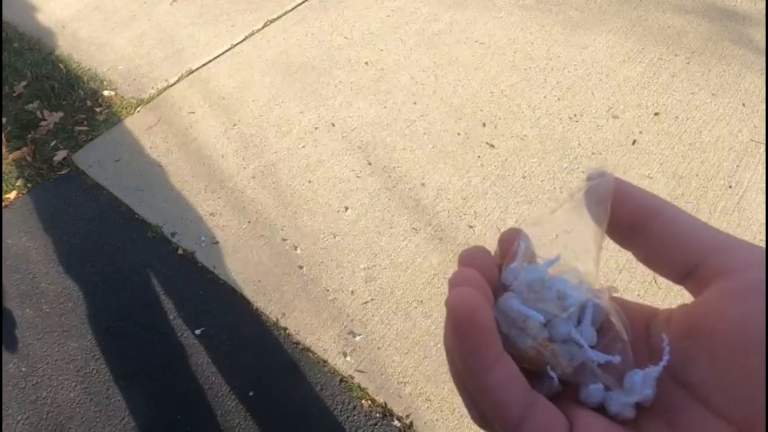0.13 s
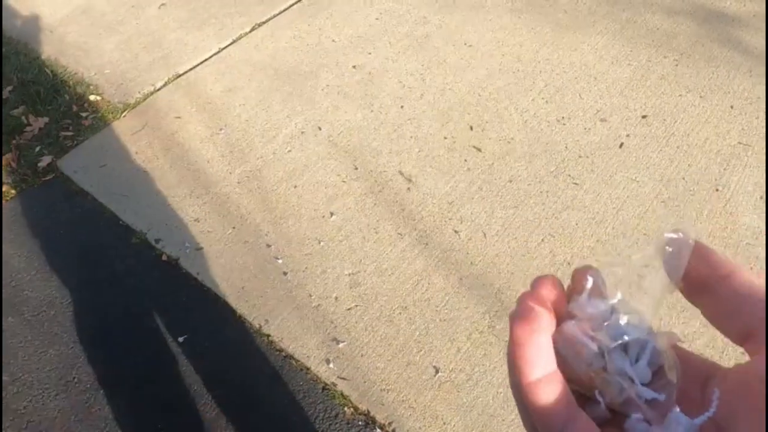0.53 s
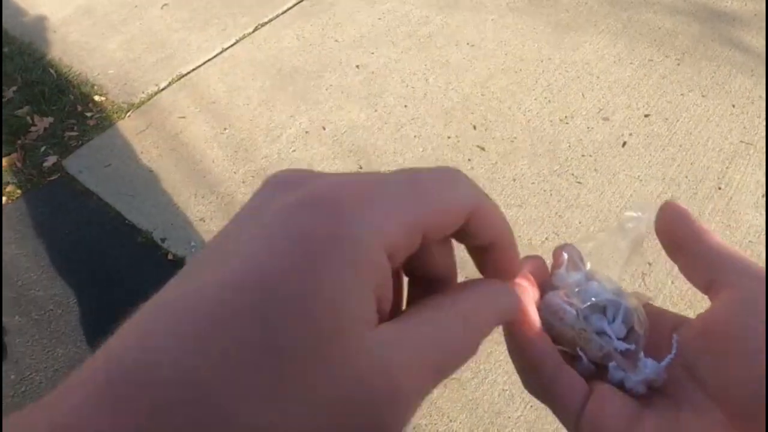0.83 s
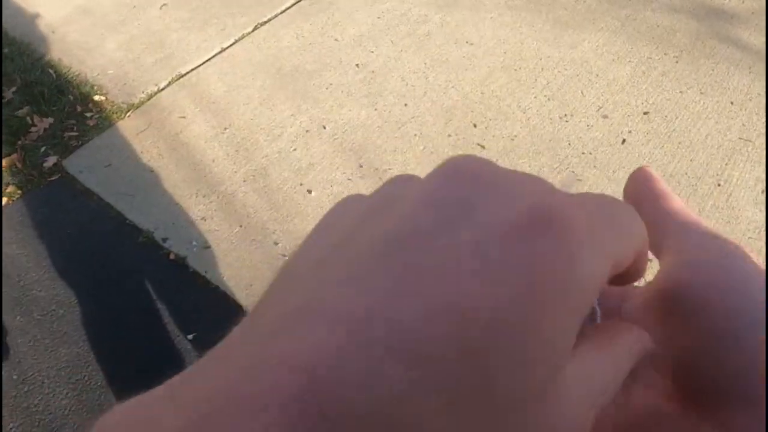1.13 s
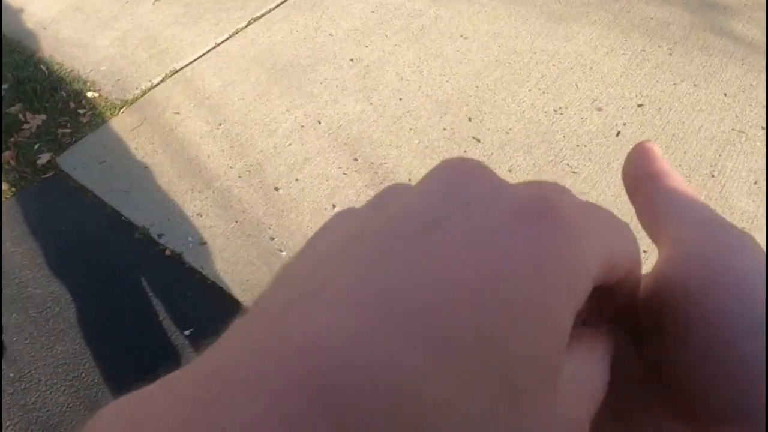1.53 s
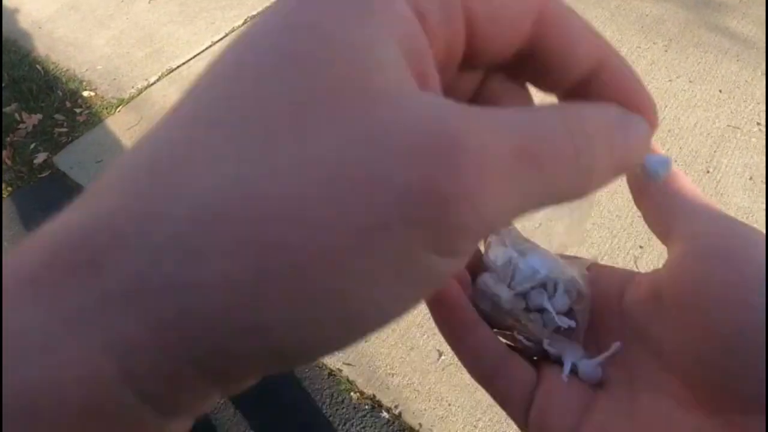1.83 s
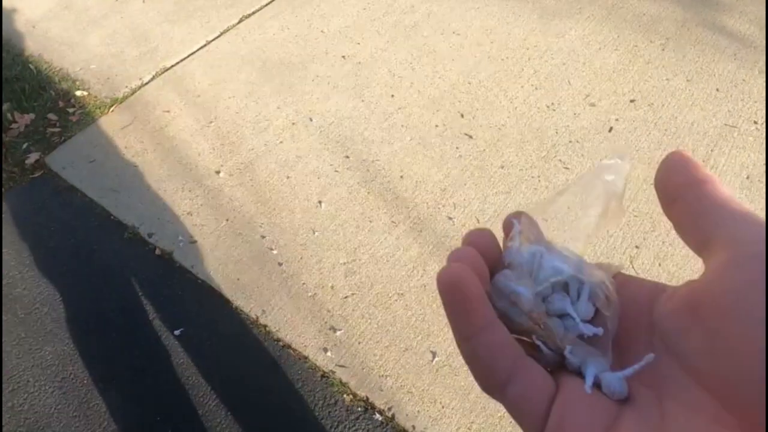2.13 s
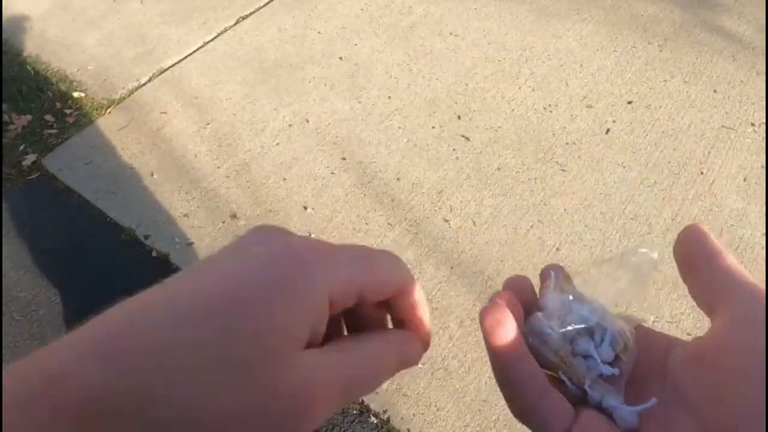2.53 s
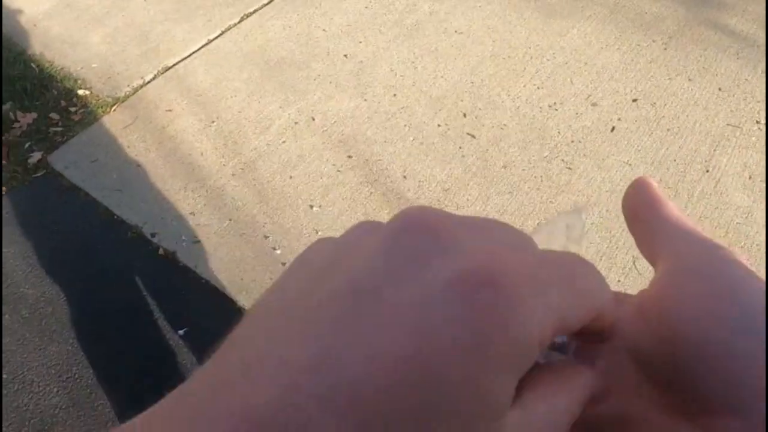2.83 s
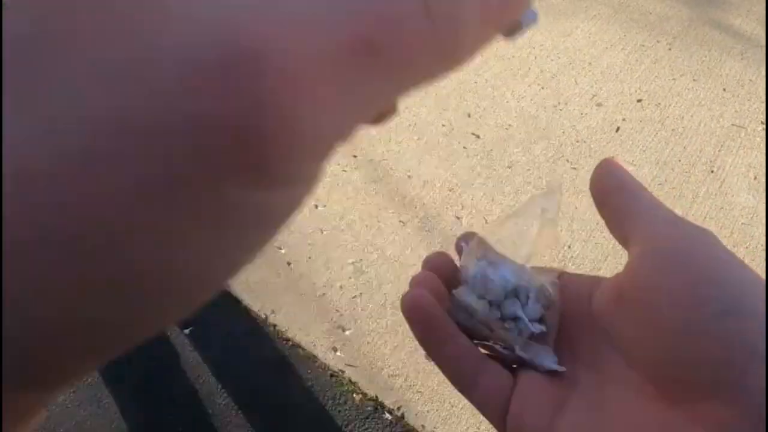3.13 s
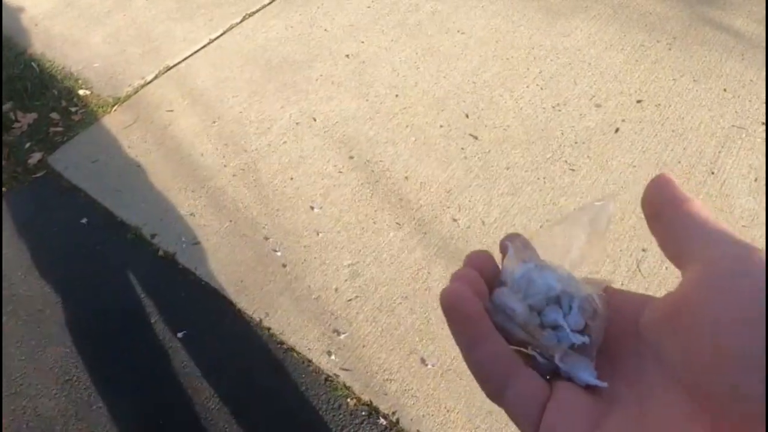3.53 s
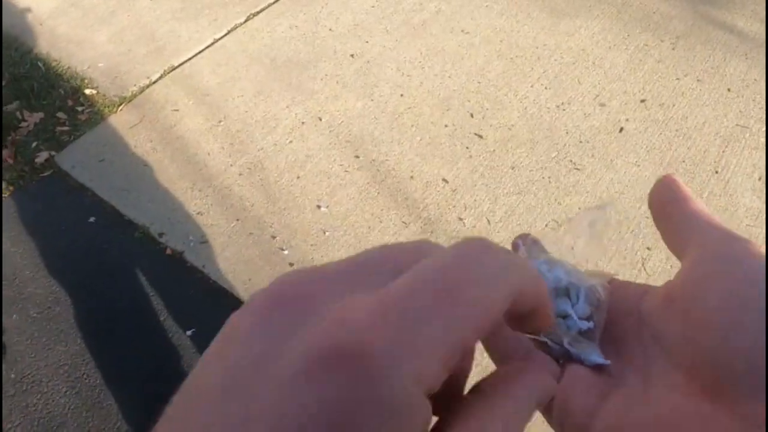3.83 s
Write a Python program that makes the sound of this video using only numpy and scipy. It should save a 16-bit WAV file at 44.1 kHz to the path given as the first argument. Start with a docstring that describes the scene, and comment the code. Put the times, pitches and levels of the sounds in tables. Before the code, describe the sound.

Small paper snaps pop loudly one by one on a pavement, amid low handling rumble and wind.

```python
"""Paper snaps on a pavement, body-worn microphones

Outdoors, three paper snaps are thrown; each bursts into noise, echoes off nearby walls and leaves a tail.
Every throw rocks the small camera: a wandering sub-bass swing, thuds as short pushes between two dips,
and flickering noise for air on its ports, with brief brighter swishes. Between throws fingers pick in
a thin plastic bag, as noise bursts and fine grains. Late on, the recorder fades the stereo to mono."""
import sys
import numpy as np
from scipy import signal
from scipy.io import wavfile

SR = 44100
rng = np.random.default_rng(int(sys.argv[2]) if len(sys.argv) > 2 else 0)


def persist_wave(psi):
    """Save psi, clipped to +-1, as 16-bit WAV."""
    counts = np.round(np.clip(psi, -1, 1) * 32767).astype(np.int16)
    wavfile.write(sys.argv[1], SR, np.atleast_2d(counts).T)


N = 176400
OPPOSITE = np.array([[1], [-1]])  # how a side signal enters left and right

# paper snaps: start_s, level_db, extra_brightness_db, extra_bite_db (near 4 and 7 kHz), far_wall_echo_db
SNAPS = [(.6378, -2.5, 0, 1, -30), (2.4404, -3.5, 7, 1, -37), (3.6897, -5, -4, -9, -46)]


def amp(db):
    """Decibels to an amplitude factor."""
    return 10 ** (np.asarray(db) / 20)


def rms_one(x):
    """Scale to an rms of 1."""
    return x / np.sqrt(np.mean(x ** 2) + 1e-20)


def in_time(rows):
    """Draw each column as straight lines between the times in the first."""
    times_s, *columns = np.transpose(rows)
    return [np.interp(np.arange(N) / SR, times_s, column) for column in columns]


def at_hz(points, hz):
    """Read a curve at a frequency, on a logarithmic frequency scale."""
    points = np.array(points)
    return np.interp(np.log(hz), np.log(points[:, 0]), points[:, 1])


def band(x, low_hz, high_hz, order=2):
    """Keep the sound between two frequencies."""
    edges_hz = [low_hz, min(high_hz, .45 * SR)]
    return signal.sosfilt(signal.butter(order, edges_hz, "band", fs=SR, output="sos"), x)


def drift(rate_hz):
    """Slow random wander of rms 1: noise through two equal one-pole smoothers."""
    step = 40  # samples between drawn points
    r = np.exp(-2 * np.pi * rate_hz * step / SR)
    noise = rng.standard_normal(N // step + 2002)
    slow = signal.lfilter([1], [1, -2 * r, r * r], noise)[2000:]  # drop the settling
    return np.interp(np.arange(N) / step, np.arange(len(slow)), rms_one(slow))


def resonate(x, hz, width_hz):
    """Ring one damped resonance; a wider one dies sooner."""
    r = np.exp(-np.pi * width_hz / SR)
    feedback = [1, -2 * r * np.cos(2 * np.pi * hz / SR), r * r]
    return signal.lfilter([(1 - r * r) / 2, 0, (r * r - 1) / 2], feedback, x)


def add(out, start_s, piece):
    """Mix a stereo piece in at a time."""
    i = int(start_s * SR)
    out[:, i:i + piece.shape[1]] += piece[:, :max(N - i, 0)]


def banded_noise(spectrum, patchy_db, rate_hz, shape=lambda hz: 1):
    """Third-octave stereo noise, each band with its level, flicker and likeness; mid rms 1 before the shape."""
    # how alike the two ports hear: hz, left_right_likeness (0 to 1)
    likeness = [(60, 1), (180, 0.78), (500, 0.19), (5000, 0.29)]
    edges = spectrum[0][0] * 2 ** np.arange(0, 12, 1 / 3)
    edges = edges[edges < min(spectrum[-1][0], .44 * SR)]
    together = drift(rate_hz)  # flicker shared by all bands
    white = rng.standard_normal((2, 2, N))
    out, power = 0, 0
    for k, (low, high) in enumerate(zip(edges, edges[1:])):
        mid, side = band(white[k % 2], low, high, order=3)
        hz = np.sqrt(low * high)
        alike = np.clip(at_hz(likeness, hz), 0, .99)
        flicker_db = patchy_db * (together + .5 * drift(rate_hz))
        gain = amp(at_hz(spectrum, hz) + flicker_db)
        piece = gain * (np.sqrt(1 + alike) * mid + np.sqrt(1 - alike) * side * OPPOSITE)
        out = out + piece * shape(hz)
        power = power + np.mean(piece.mean(0) ** 2)
    return out / np.sqrt(power)


def lurch():
    """The camera's slow swing of wandering pitch with lumpy flutter, nearly the same on both ports."""
    # sub-bass swing of the camera: time_s, level_db
    lurch_levels = [(0.0, -41), (0.34, -26), (0.43, -12), (0.53, -9.5), (1.09, -37), (1.15, -28.5),
                    (1.48, -46.5), (1.59, -22), (1.7, -42.5), (1.78, -29), (2.14, -38.5), (2.19, -18),
                    (2.41, -4.5), (2.44, -15.5), (2.71, -27), (3.26, -40.5), (3.62, -6.5), (3.77, -14),
                    (3.83, -20), (4.0, -23.5)]
    centre_hz, pitch_wander, flutter_db, side_db = 14, 0.46, -10.5, -24
    level_db, = in_time(lurch_levels)
    pitch_hz = centre_hz * np.exp(pitch_wander * np.tanh(drift(9.01)))
    phase = 2 * np.pi * np.cumsum(pitch_hz) / SR
    swing = np.sqrt(2) * np.sin(phase) * amp(1.5 * drift(10))
    flutter, side = rms_one(band(rng.standard_normal((2, N)), 18, 45, order=4))
    return amp(level_db) * (swing + amp(flutter_db) * flutter + amp(side_db) * side * OPPOSITE)


def air():
    """Air buffeting the ports: flickering low boom and higher rush, each following its own level."""
    # air on the ports: time_s, boom_level_db, rush_level_db (both before the lifts below)
    air_levels = [(0.0, -64.5, -65), (0.2, -57.5, -59), (0.56, -35, -35.5), (0.81, -59, -58.5),
                  (1.32, -65.5, -64), (1.82, -72, -67), (2.08, -55, -54.5), (2.36, -33.5, -34),
                  (2.42, -37, -38.5), (2.65, -59, -55.5), (2.86, -67.5, -75), (3.15, -68.5, -71),
                  (3.41, -55.5, -57.5), (3.61, -31.5, -34.5), (3.69, -32.5, -33.5), (3.84, -52.5, -57.5),
                  (4.0, -57, -59.5)]
    # colour of the boom: hz, density_db (per Hz)
    boom_spectrum = [(29, -39), (50, -2.5), (64, -10.5), (275, -16), (548, -24.5), (900, -33), (1170, -49),
                     (1980, -120)]
    # colour of the rush: hz, density_db (per Hz)
    rush_spectrum = [(500, -12.5), (980, -6.5), (1240, 8.5), (1640, -9.5), (2200, -20.5), (3600, -20.5),
                     (5500, -35.5), (7500, -53)]
    boom_lift_db, rush_lift_db = 10, 3.0
    gust_hz, gust_slope = 132.16, 0.1  # below gust_hz: extra dB per dB of boom level
    boom_db, rush_db = in_time(air_levels)

    def gust(hz):
        """The lowest bands sink further whenever the boom is below its strongest."""
        return amp((hz < gust_hz) * gust_slope * (boom_db - boom_db.max()))
    boom = banded_noise(boom_spectrum, 2.8, 17, gust)
    rush = banded_noise(rush_spectrum, 2.58, 24)
    return amp(boom_db + boom_lift_db) * boom + amp(rush_db + rush_lift_db) * rush


def floor():
    """Steady quiet noise under everything, flickering only slightly."""
    # colour of the floor: hz, density_db (per Hz)
    floor_spectrum = [(900, -9), (1300, 9), (1800, -7), (3400, -9), (5200, -20), (7300, -23), (8600, -40),
                      (11000, -48)]
    level_db = -65
    return amp(level_db) * banded_noise(floor_spectrum, 0.36, 5)


def thuds():
    """Each jolt of the mount is one short push between two dips, with a dull noisy knock on top."""
    # jolts of the mount: centre_s, level_db, pitch_hz, knock_db (relative to the push)
    jolts = [(0.4, -23, 149.8, -15), (0.507, -28.5, 260.5, -0.5), (0.547, -10.5, 138.4, -7.5),
             (0.809, -28, 218, -17), (1.74, -42.5, 105.5, -20), (2.085, -35.5, 204, -11.5),
             (2.393, -6.5, 122.3, -12), (2.514, -15.5, 145, -16), (2.641, -29.5, 194, -15.5),
             (3.565, -1.5, 174.1, -6.5), (3.59, -7.5, 142, -19.5), (3.63, -12.5, 189.7, -5),
             (3.865, -26.5, 206, -12)]
    width_turns, knock_low_hz, knock_high_hz = 0.48, 200, 1100  # width and top before the level acts on them
    out = np.zeros((2, N))
    for centre_s, level_db, hz, knock_db in jolts:
        half = int(2 * SR / hz)
        turns = np.arange(-half, half) * hz / SR
        # softer jolts last longer, harder jolts knock brighter
        shape = np.exp(-(turns / width_turns * amp(0.073 * level_db)) ** 2)
        noise = rng.standard_normal((2, len(turns)))
        knock = rms_one(band(noise, knock_low_hz, knock_high_hz * amp(.3 * level_db), order=4))
        push = np.cos(2 * np.pi * turns)
        add(out, centre_s - 2 / hz, amp(level_db) * shape * (push + amp(knock_db) * knock))
    return out


def swishes():
    """Smooth swells of bright air noise as the arm whips past."""
    # arm swishes: centre_s, level_db, length_s
    swells = [(0.431, -53.5, 0.018), (0.517, -40.5, 0.022), (2.405, -41, 0.11), (3.568, -36.5, 0.0075),
              (3.595, -42, 0.032)]
    t = np.arange(N) / SR
    shape = sum(amp(level_db) * np.exp(-((t - centre_s) / length_s * 2) ** 2)
                for centre_s, level_db, length_s in swells)
    return shape * rms_one(band(rng.standard_normal((2, N)), 1200, 3960, order=4))


def cracks():
    """Shock fronts over a few milliseconds ring the resonances; nearby scatter is duller, walls echo."""
    # resonances that colour a crack: hz, width_hz, level_db
    resonances = [(1080, 1400, -0.5), (1640, 590, 0.5), (2700, 1100, 0.5), (3927, 970, 3.5),
                  (5320, 1400, -9.5), (7070, 1400, -7.5), (12460, 2500, -20.5)]
    # echoes from nearby walls: delay_s, level_db (relative to the snap, before its brightness)
    near_walls = [(.015, -20), (.04, -33), (.061, -33), (.09, -32), (.12, -36)]
    rise_s, blast_t60_s, scatter_db, scatter_t60_s = .0008, .011, -25, .13
    echo_low_hz, echo_high_hz, echo_t60_s = 2400, 7200, .045
    far_delay_s, far_high_hz, far_t60_s = .2135, 5500, .022
    out, t = np.zeros((2, N)), np.arange(SR // 8) / SR
    for start_s, level_db, top_db, bite_db, far_db in SNAPS:
        front = t / rise_s * np.exp(-t / rise_s) + amp(-13.0 - 60 * t / blast_t60_s)
        signs = rng.choice([-1, 1], (2, len(t)))
        scatter = band(signs * amp(scatter_db - 60 * t / scatter_t60_s), 600, 9500, order=3)
        burst = front * signs + scatter
        extra_db = [0, 0, 0, bite_db, -bite_db / 2, bite_db, top_db]  # one per resonance
        crack = 0
        for k, ((hz, width_hz, ring_db), more_db) in enumerate(zip(resonances, extra_db)):
            ring = resonate(resonate(burst, hz, width_hz), hz, width_hz) / np.sqrt(width_hz)
            crack = crack + amp(ring_db + more_db) * (-1) ** k * ring
        # level set by the rms of the first 3.3 ms
        crack *= amp(level_db - 6.0) / np.sqrt(np.mean(crack[:, :SR // 300] ** 2))
        add(out, start_s, crack * amp(1.5 * OPPOSITE))  # stronger on the left port
        walls = [(delay_s, db + top_db * 0.15, echo_t60_s, echo_high_hz) for delay_s, db in near_walls]
        walls.append((far_delay_s, far_db, far_t60_s, far_high_hz))
        for delay_s, echo_db, t60_s, high_hz in walls:
            fade = np.minimum(t / .003, 1) * amp(-60 * t / t60_s)
            smear = band(rng.standard_normal((2, len(t))) * fade, echo_low_hz, high_hz, order=6)
            add(out, start_s + delay_s, amp(level_db + echo_db) * smear)
    return out


def tails():
    """The street answers each crack with diffuse noise that holds, then dies sooner in the treble."""
    # colour of the diffuse tail: hz, density_db (per Hz)
    tail_spectrum = [(1700, -11), (2000, -11.5), (2600, -0.5), (3900, 2), (5200, -6), (7000, -19),
                     (9000, -43.5)]
    tail_db, hold_s = -45.5, 0.096  # level relative to the snap
    t60_at_3khz_s, treble_loss = 0.66, 0.23
    t = np.arange(N) / SR

    def shape(hz):
        """Hold and decay of every tail at one frequency."""
        t60_s = t60_at_3khz_s * (hz / 3000) ** -treble_loss
        return sum((t > start_s) * amp(tail_db + db - 60 * np.maximum(t - start_s - hold_s, 0) / t60_s)
                   for start_s, db, *_ in SNAPS)
    return banded_noise(tail_spectrum, 3.9, 40, shape)


def bag():
    """Plastic gives single crinkles, short bands of noise, and a fine random crackle under the fingers."""
    # single crinkles: start_s, peak_db, pitch_hz
    crinkles = [(1.2006, -52.5, 4000), (1.4355, -43, 2630), (1.4856, -43.5, 4000), (1.564, -47.5, 4700),
                (1.588, -41.5, 2930), (1.6873, -45.5, 4100), (1.852, -50.5, 3420), (3.12, -47.5, 4150)]
    # spells of fingers moving in the bag: start_s, end_s
    fingering = [(1.1, 1.95), (2.85, 3.3)]
    crinkle_t60_s, grain_db = .018, -62
    grains_per_s = 1000  # before the wander
    out, t = np.zeros((2, N)), np.arange(N) / SR
    for start_s, peak_db, hz in crinkles:
        burst = rng.standard_normal((2, SR // 30)) * amp(-60 * t[:SR // 30] / crinkle_t60_s)
        burst = band(burst, hz / 1.4, hz * 1.35, order=3)
        add(out, start_s, amp(peak_db) * burst / np.abs(burst).max())
    busy = sum((t > start_s) & (t < end_s) for start_s, end_s in fingering)
    sizes = amp(3 * np.minimum(rng.exponential(1, (2, N)), 4)) * rng.choice([-1, 1], (2, N))
    born = rng.random(N) < grains_per_s * busy * amp(8.0 * drift(12.0)) / SR  # same instants on both ports
    return out + amp(grain_db) * band(sizes * born + 1e-18, 2500, 8000, order=4)


def scene():
    """All the layers, summed at the two ports."""
    return lurch() + air() + floor() + thuds() + swishes() + cracks() + tails() + bag()


def record(dry):
    """The side channel fades out late on, peaks are rounded, the top is cut."""
    fold_start_s, fold_db_per_s, cutoff_hz = 2.5, -36, 15400
    mid, side = dry.mean(0), (dry[0] - dry[1]) / 2
    side = side * amp(fold_db_per_s * np.maximum(np.arange(N) / SR - fold_start_s, 0))
    both = np.array([mid + side, mid - side])
    rounded = both / (1 + both ** 8) ** .125
    top_cut = signal.cheby2(12, 70, cutoff_hz, fs=SR, output="sos")
    return np.clip(signal.sosfilt(top_cut, rounded), -1, 1)


dry = scene()
out = record(dry)
persist_wave(out)
```